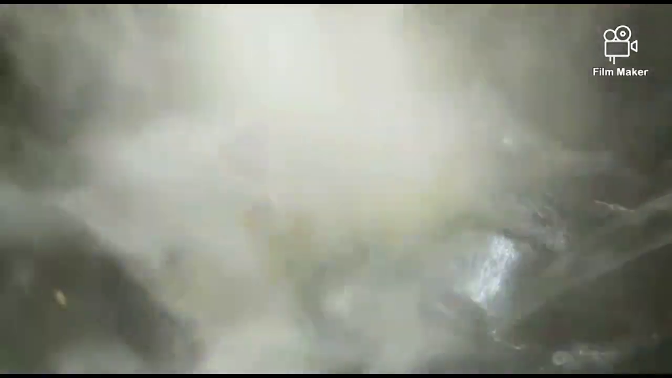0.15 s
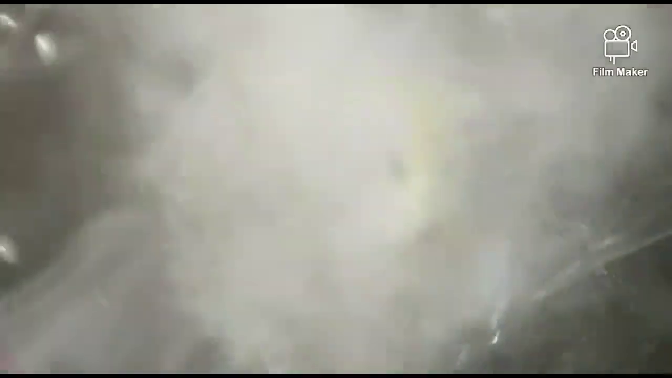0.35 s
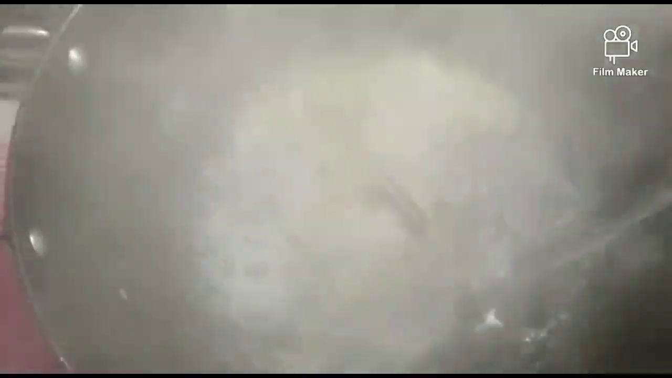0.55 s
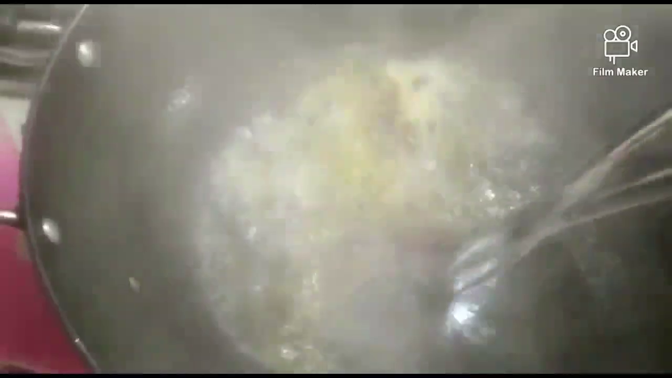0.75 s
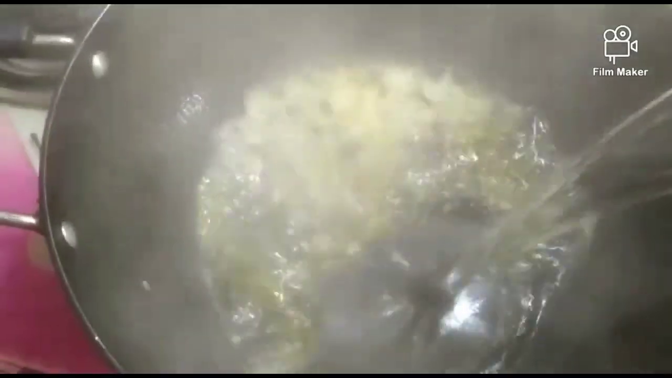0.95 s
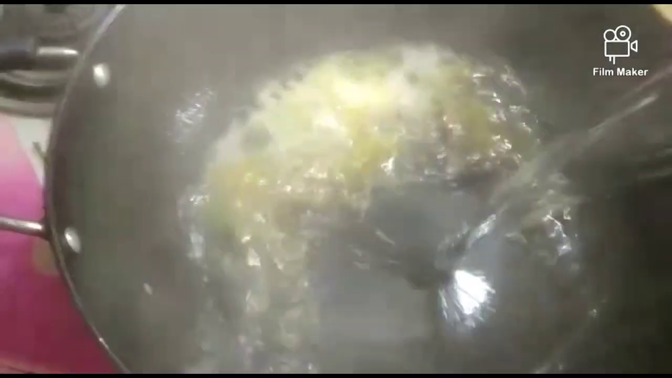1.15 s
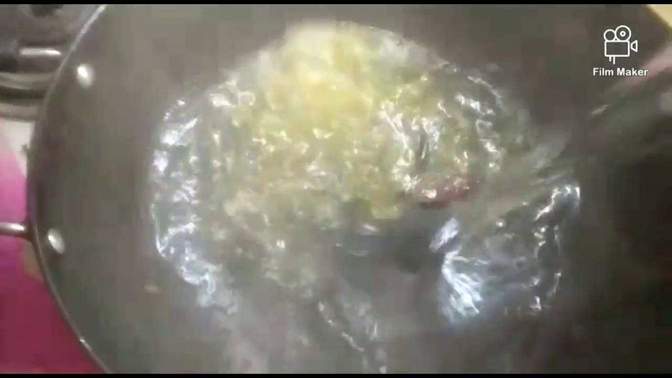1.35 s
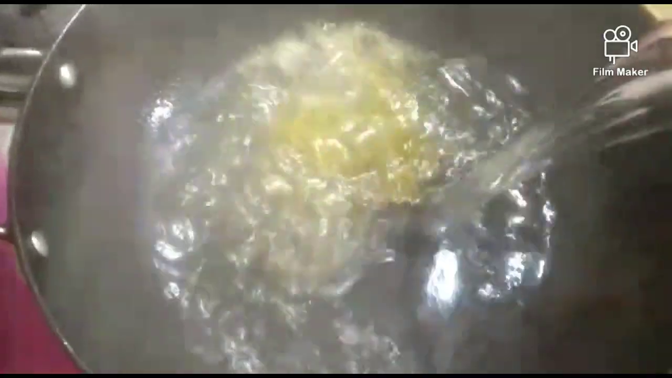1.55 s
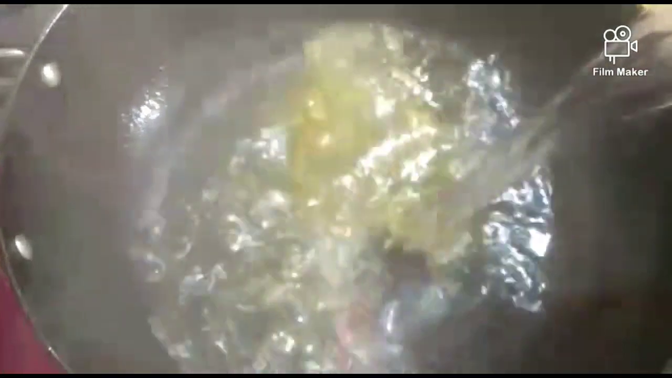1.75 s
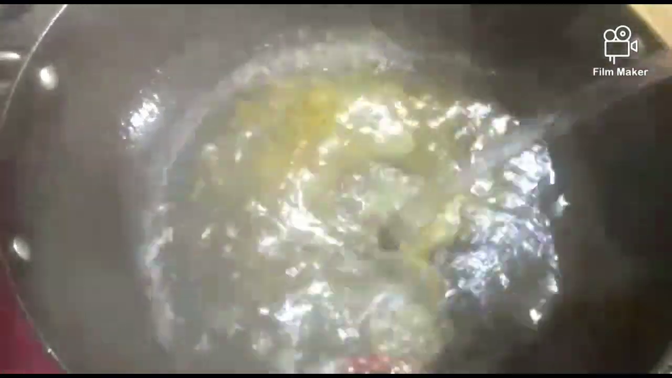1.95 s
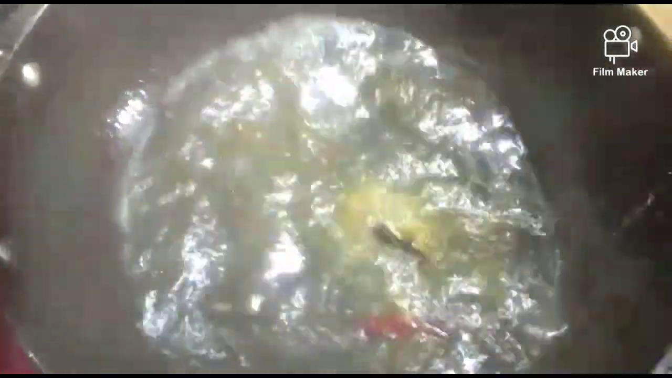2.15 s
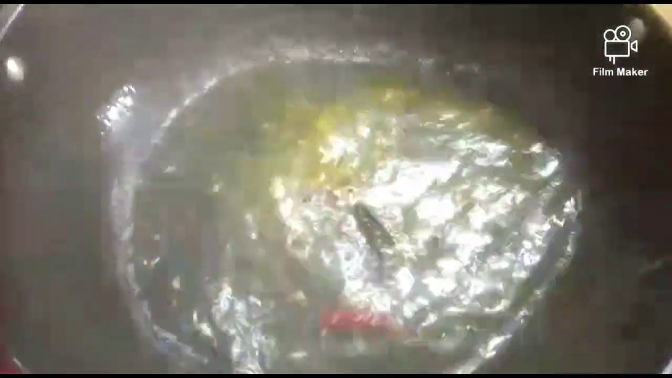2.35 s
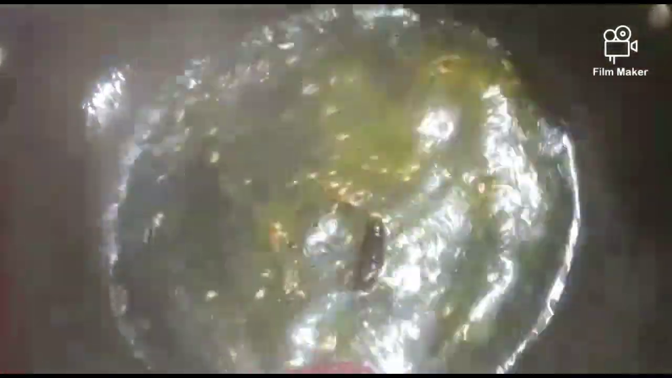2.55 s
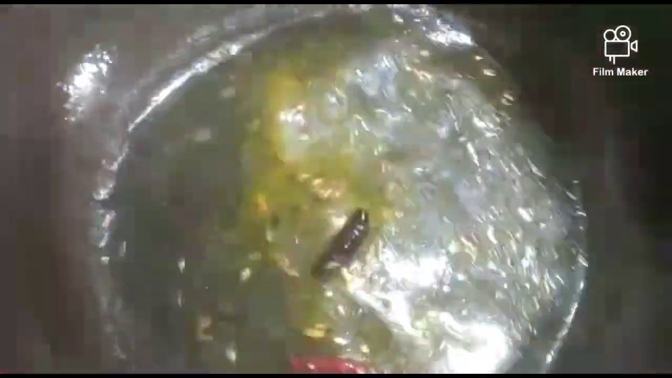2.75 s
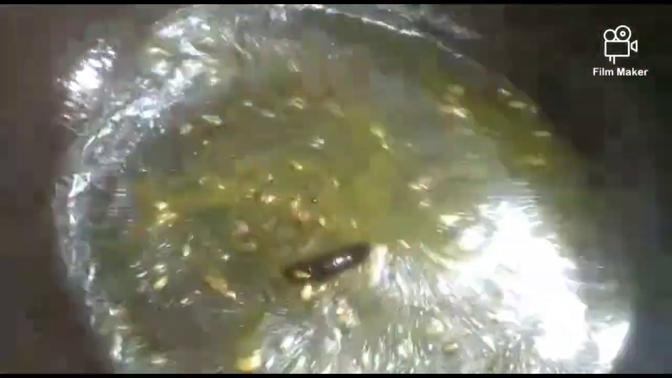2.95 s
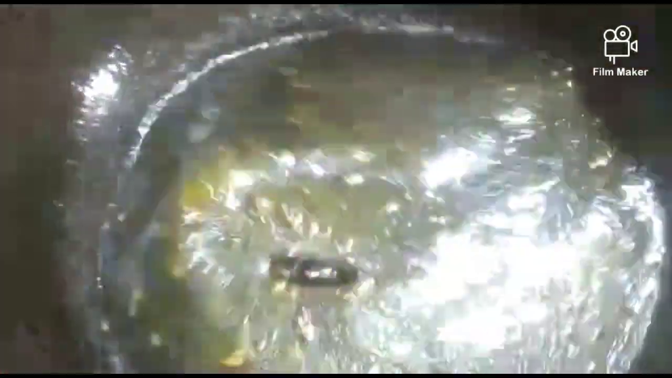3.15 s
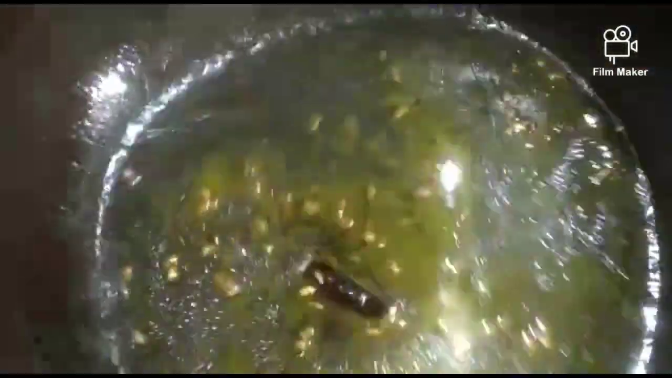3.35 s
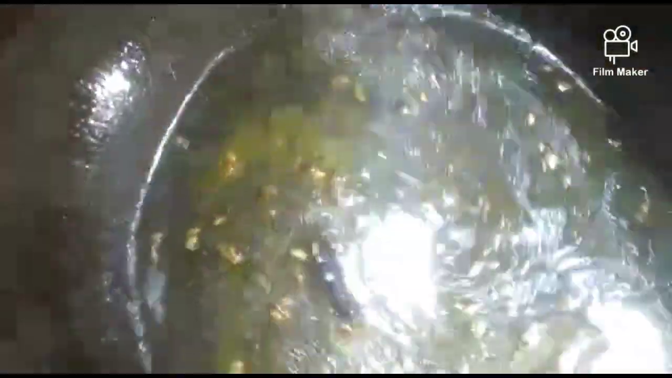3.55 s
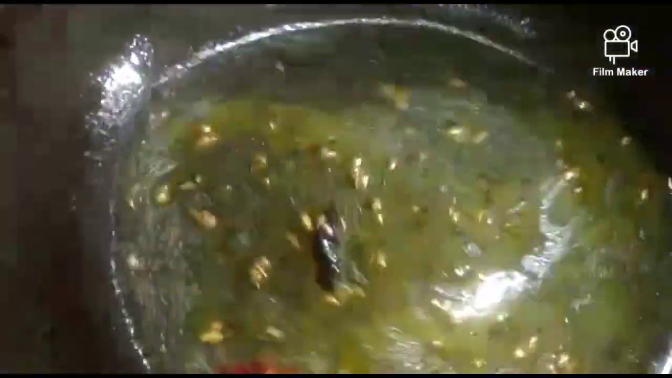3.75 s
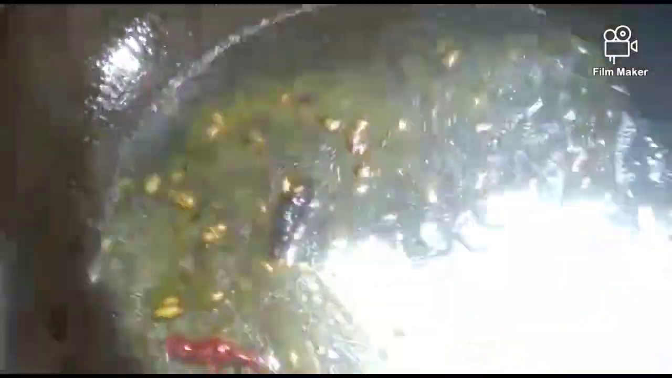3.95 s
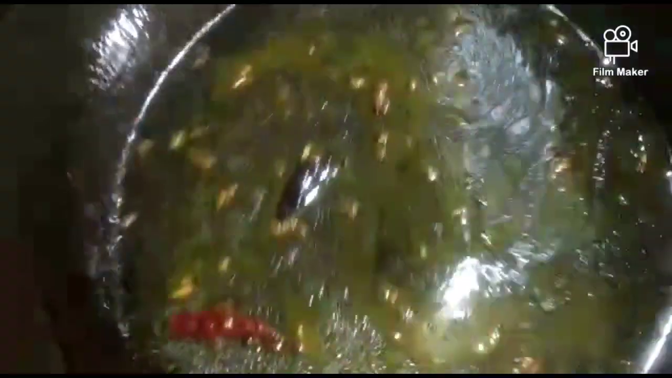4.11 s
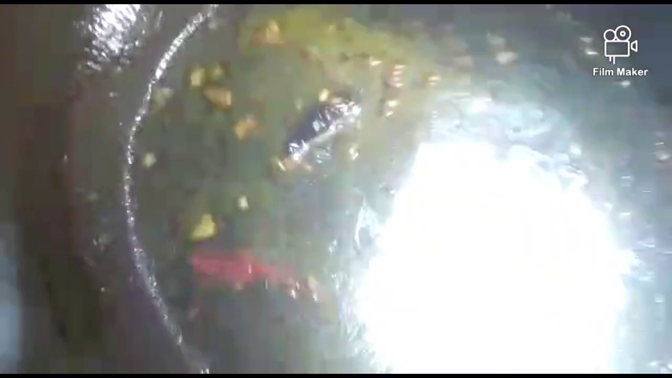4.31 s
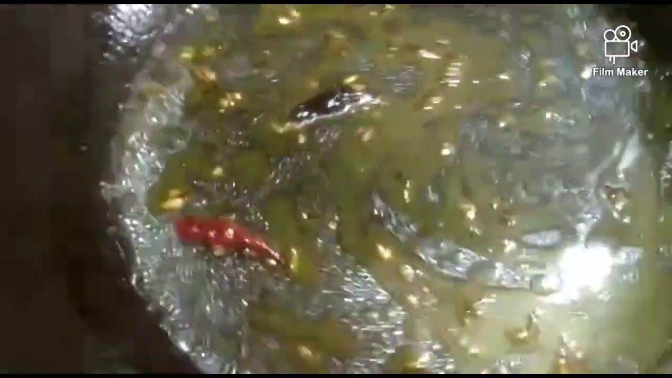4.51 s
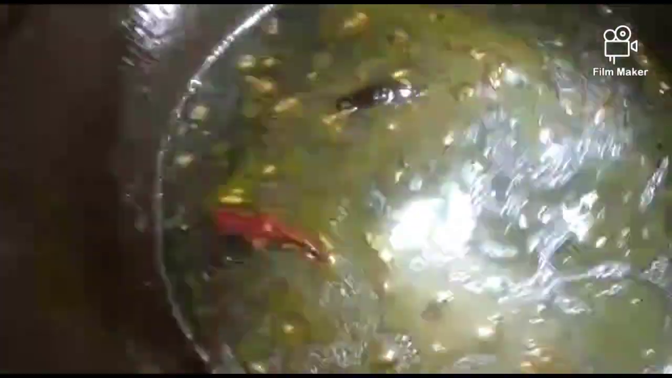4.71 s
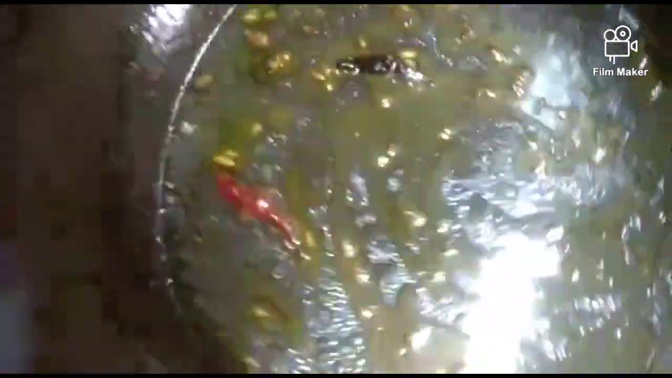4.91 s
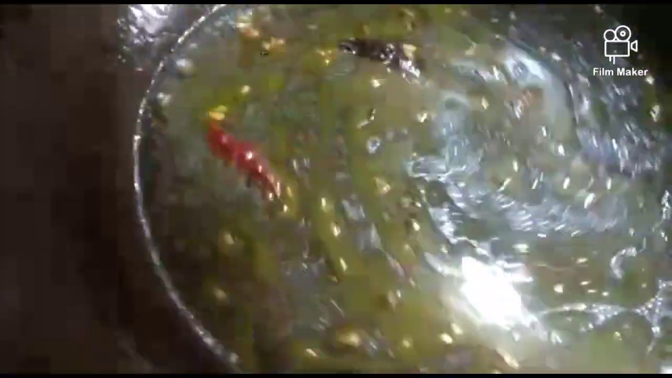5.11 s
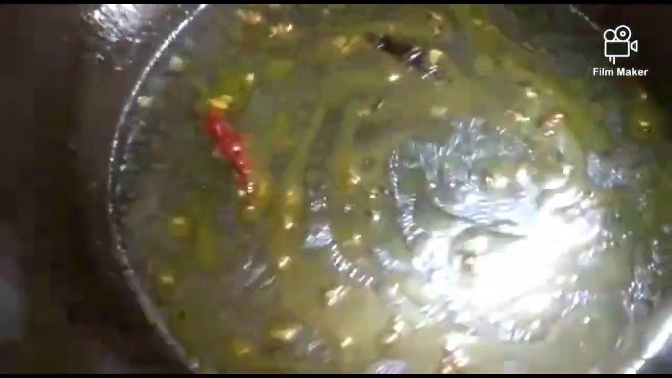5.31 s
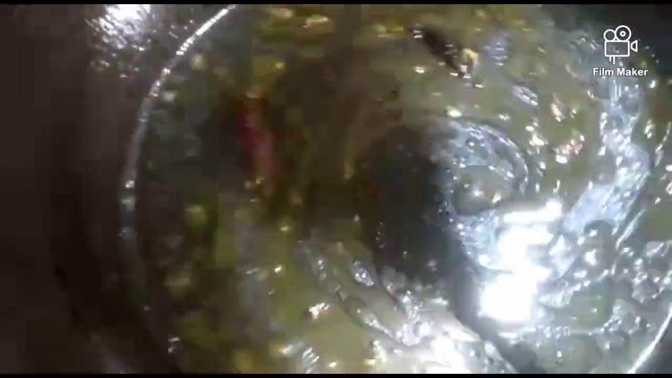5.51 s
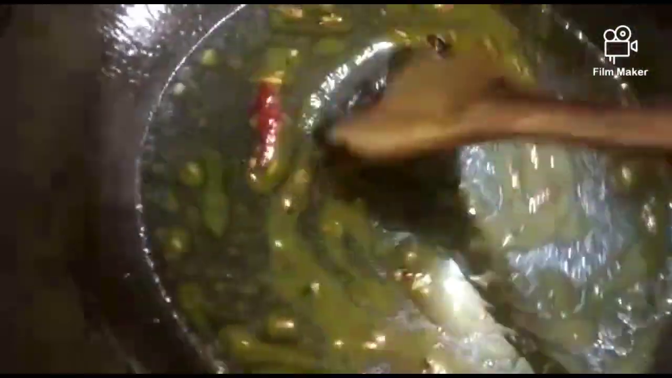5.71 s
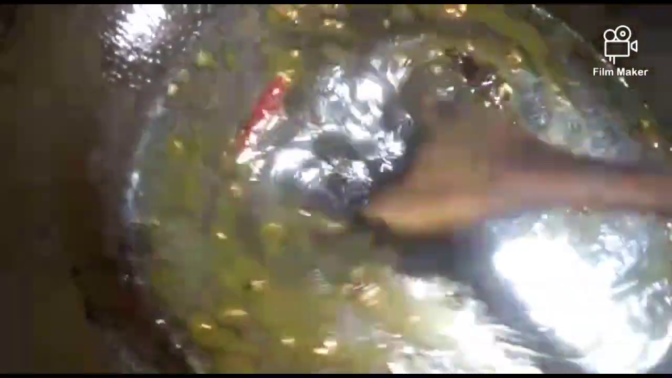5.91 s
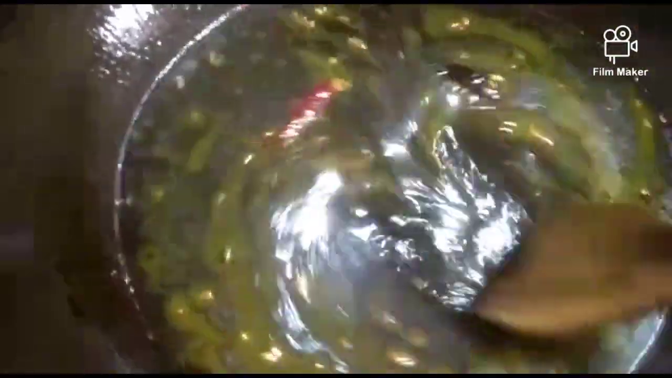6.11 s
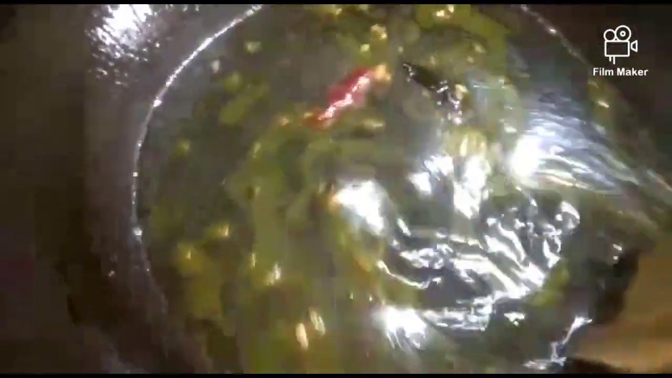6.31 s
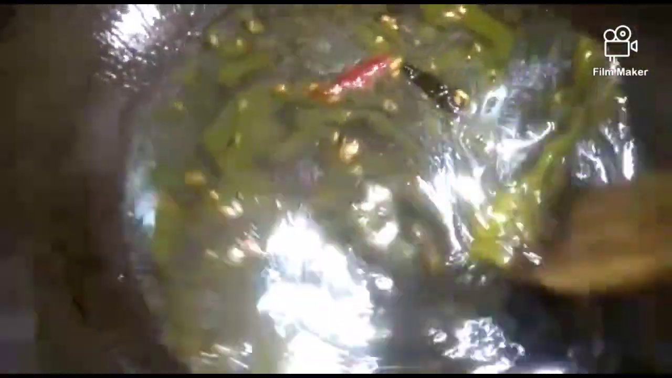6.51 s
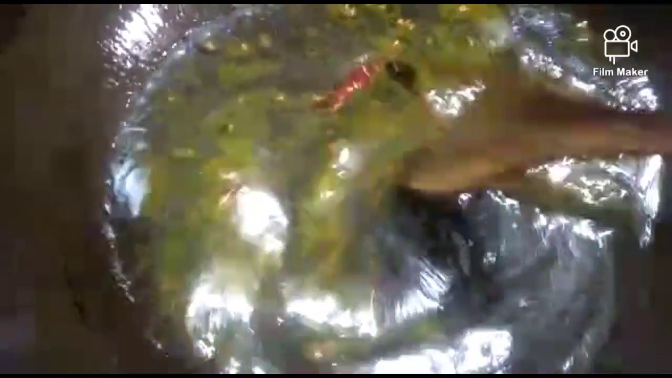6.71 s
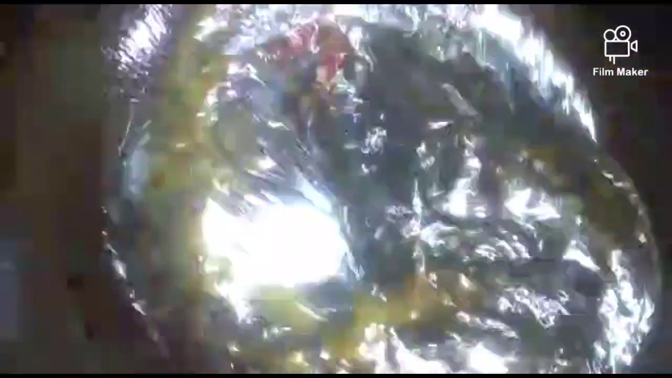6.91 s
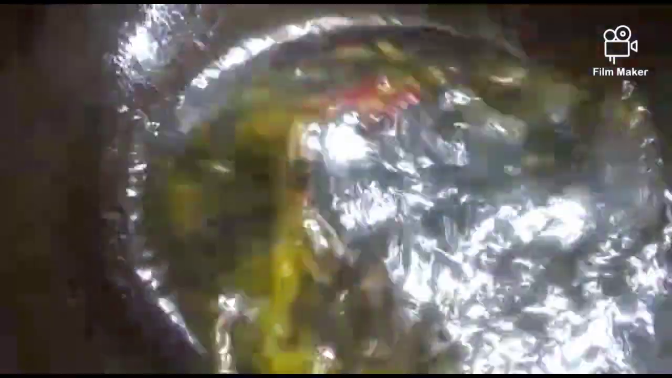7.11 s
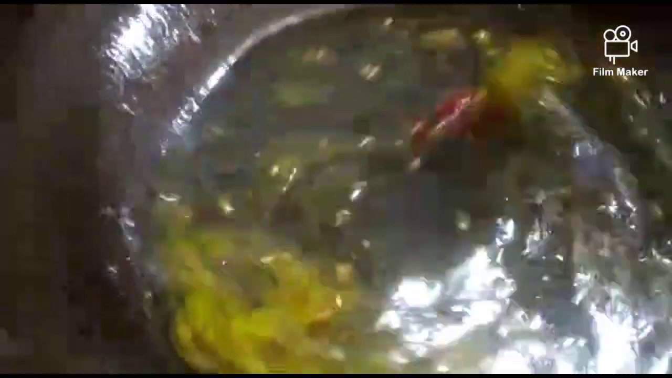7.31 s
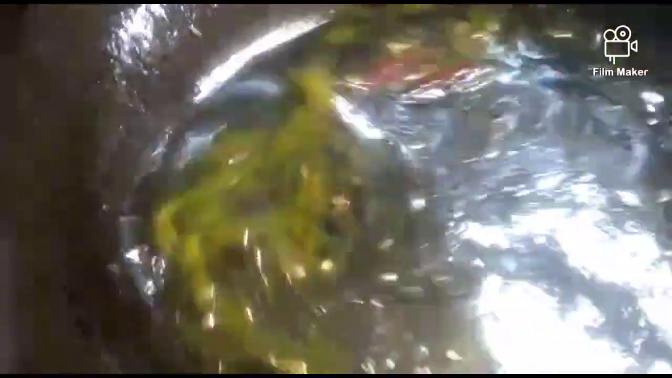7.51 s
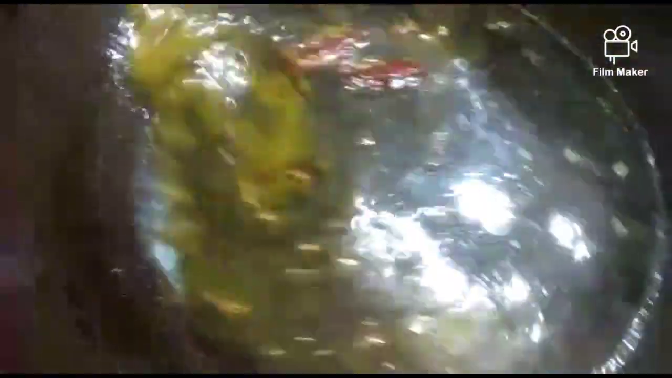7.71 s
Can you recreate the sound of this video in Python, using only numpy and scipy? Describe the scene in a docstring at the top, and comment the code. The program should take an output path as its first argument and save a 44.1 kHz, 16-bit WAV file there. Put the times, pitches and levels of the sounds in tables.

```python
"""Oil and spices sizzle as water is poured into a hot wok: random bubble clicks fizz and spatter, thinning to
a crackle as the pan cools, while larger bubbles boil beneath and lone drops spit.
A steel vessel clangs down as decaying beating modes; a wooden spatula sloshes, rasps and knocks the wok's
modes, and the sizzle wakes again. Filtered noise makes the steam buffeting the microphone ports and the gas
flame's rumble; dense echoes make the small hard kitchen."""
import sys
import numpy as np
from scipy import signal
from scipy.fft import rfft, irfft, next_fast_len
from scipy.io import wavfile

SR = 44100
rng = np.random.default_rng(int(sys.argv[2]) if len(sys.argv) > 2 else 0)


def file_out(sig):
    """Save sig as 16-bit WAV at sys.argv[1]."""
    # one column per channel
    cols = np.atleast_2d(sig).T
    # limit, then scale
    lim = np.clip(cols, -1, 1)
    pcm = np.round(lim * 32767).astype(np.int16)
    wavfile.write(sys.argv[1], SR, pcm)


N = 341951
TIME = np.arange(N) / SR


def undb(db):
    """Decibels to gain."""
    return 10 ** (np.asarray(db) / 20)


def curve(rows):
    """Level against time, joined by straight lines."""
    rows = np.asarray(rows)
    return np.interp(TIME, rows[:, 0], rows[:, 1])


def unit(x):
    """Scale to rms 1."""
    return x / np.sqrt(np.mean(x ** 2) + 1e-18)


def rfft_hz(x):
    """Frequencies of the padded spectrum of x."""
    return np.fft.rfftfreq(2 * next_fast_len(x.shape[-1] // 2 + 2048), 1 / SR)


def weigh(x, gain):
    """Multiply the padded spectrum of x by a gain."""
    size = 2 * (len(gain) - 1)
    return irfft(rfft(x, size) * gain, size)[..., :x.shape[-1]]


def shape(x, points):
    """Filter by (freq_hz, gain_db) points, falling 40 dB per octave beyond both ends."""
    hz, db = np.transpose(points)
    octave, known = np.log2(rfft_hz(x) + 1), np.log2(hz)
    below = np.maximum(known[0] - octave, 0)
    above = np.maximum(octave - known[-1], 0)
    return weigh(x, undb(np.interp(octave, known, db) - 40 * (below + above)))


def resonate(x, hz, q):
    """Two-pole band-pass."""
    hz = min(hz, .4 * SR)
    b, a = signal.iirpeak(hz, max(q, hz / (.4 * SR)), fs=SR)
    return signal.lfilter(b, a, x)


def walk(rate):
    """Random wander of spread about 1, reaching a new value rate times a second."""
    return 1.2 * np.interp(TIME * rate, np.arange(4096), rng.standard_normal(4096))


def add(out, s, sound):
    """Mix a sound in at time s."""
    start = int(s * SR)
    out[:, start:start + sound.shape[-1]] += sound[..., :N - start]


def fade(t, t60):
    """Exponential decay, 60 dB down at t60."""
    return np.exp(-np.log(1000) * t / t60)


def pair(size, alike):
    """Left and right noises with a given likeness (1 is mono)."""
    mid, side = rng.standard_normal((2, size))
    alike = np.clip(alike, 0, 1)
    return np.sqrt((1 + alike) / 2) * mid + np.sqrt((1 - alike) / 2) * np.array([side, -side])


def echoes(x, t60, db, alike):
    """Add dense reflections that die away; the two ports hear nearly the same bass."""
    t = np.arange(SR // 2) / SR
    bass = shape(pair(len(t), .9), [(20, 0), (1000, 0), (1800, -12)])
    treble = shape(pair(len(t), alike), [(900, -12), (1600, 0), (20000, 0)])
    tail = (bass + treble) * fade(t, t60) * (1 - fade(t, t60 / 10))
    tail *= undb(db) / np.sqrt(np.sum(tail ** 2) / 2)
    return x + signal.fftconvolve(x, tail, axes=1)[:, :N]


def bursts(per_s, spread_db, smear_s, smear_db):
    """Random clicks of uneven size, each with its own short rustle of reflections in the bowl."""
    born = rng.random(N) < per_s / SR
    size = undb(spread_db * np.minimum(rng.exponential(size=N), 5.5)) * rng.choice([-1, 1], N)
    clicks = born * size / np.sqrt(per_s)
    # clicks are spread over the pan, so each reaches the left port after its own delay in samples
    lag = np.round(8 + 3.7 * rng.standard_normal(N)).astype(int)
    left = np.bincount(np.clip(np.arange(N) + lag, 0, N - 1), clicks, N)
    # the rustle is noise that follows the smoothed power of the clicks
    keep = np.exp(-1 / (smear_s * SR))
    power = signal.lfilter([1 - keep], [1, -keep], clicks ** 2 + 1e-18)
    rustle = np.sqrt(power) * rng.standard_normal((2, N))
    return unit(np.array([left, clicks]) + undb(smear_db) * rustle)


def ring(modes, t):
    """Decaying modes, each a touch out of tune from blow to blow; the left port hears them late."""
    hz, db, t60 = np.transpose(modes)[:, :, None]
    hz = hz * (1 + .004 * rng.standard_normal((len(modes), 1)))
    size = undb(db) * fade(t, t60)
    lags_s = (4 / SR, 0)
    return np.array([(size * np.sin(2 * np.pi * hz * np.maximum(t - lag, 0))).sum(0) for lag in lags_s])


def flame():
    """The gas flame rumbles under the wok as shaped noise, nearer the left port."""
    # burner rumble over time: start_s [s], level_db [dB]
    flame_level = [(1.4, -61), (2.1, -53), (3.1, -50.5), (4.4, -49), (5.3, -47), (6.9, -43.5), (7.1, -49)]
    # spectrum of the rumble: freq_hz [Hz], gain_db [dB]
    flame_colour = [(15, 4.5), (35, 1), (65, -3), (80, -0.5), (92, 6), (100, 0), (109, 4), (124, -13.5),
                    (145, -9), (175, -6.5), (205, -15.5), (275, -5.5), (330, -12.5), (700, -19.5),
                    (2000, -31)]
    rumble = unit(shape(pair(N, 0.86), flame_colour)) * undb([[1.8], [-1.8]])
    return rumble * undb(curve(flame_level))


def steam():
    """The first cloud of steam buffets the ports as fluttering noise; as it slows a deep rumble is left."""
    # spectrum of the deep rumble: freq_hz [Hz], gain_db [dB]
    rumble_colour = [(2, 26), (5, 17), (18, -11), (45, -7), (90, -24), (200, -40)]
    # spectrum of the first blast: freq_hz [Hz], gain_db [dB]
    buffet_colour = [(35, 6), (70, -5), (120, -3), (200, -8.5), (400, -9.5), (1200, -17)]
    rumble_db, rumble_t60_s = -19.5, 1.9
    buffet_db, buffet_hold_s, buffet_t60_s, flutter_db = -21.5, 0.11, 0.3, 2.3
    rumble = unit(shape(pair(N, 0.37), rumble_colour)) * undb(rumble_db) * fade(TIME, rumble_t60_s)
    blast = fade(np.maximum(TIME - buffet_hold_s, 0), buffet_t60_s)
    flutter = undb(buffet_db + flutter_db * walk(66))
    buffet = unit(shape(pair(N, 0.15), buffet_colour)) * blast * flutter
    return rumble + buffet


def vessel():
    """The vessel thuds on the stove top, shaking it and the wok, and rocks; each contact feeds its ring, which
    the hand damps."""
    # contacts: a light knock before the vessel is set down, then the vessel rocking to rest: start_s [s],
    # thud_db [dB], ring_db [dB]
    contacts = [(3.521, -29.5, -63), (3.674, -11.5, -18.5), (3.697, -25, -28), (3.723, -26, -41),
                (3.84, -32, -55)]
    # modes of the stove top and of the wok the thud shakes: pitch_hz [Hz], level_db [dB], t60_s [s]
    shaken_modes = [(179.2, -13, 0.37), (303, -15, 0.18), (331, -19, 0.3), (500, -13.5, 0.19),
                    (601, -14, 0.53), (679.3, -9, 0.5), (718, -10, 0.24), (794, -6, 0.22), (853, -17, 0.21),
                    (1045, -20, 0.45), (1140, -19, 0.3), (1276, -20, 0.28)]
    # the vessel's bending modes, close pairs that beat: pitch_hz [Hz], level_db [dB], t60_s [s], split_hz [Hz]
    vessel_modes = [(2445, -3, 0.41, 18), (4860, -0.5, 0.27, 10), (8030, 1.5, 0.26, 12),
                    (9200, -19, .12, 27), (11820, -20, 0.14, 30), (12880, -1, 0.089, 17),
                    (13910, -12, 0.15, 35)]
    gripped_s = 3.755  # from here the hand damps the ring
    ring_rise_s = 0.022  # the ring spreads round the rim
    thuds, clangs, t = np.zeros((2, N)), np.zeros((2, N)), np.arange(SR // 2) / SR
    for s, thud_db, _ in contacts:
        crack = shape(pair(len(t), 0.25), [(150, -31), (280, -2), (780, 6.5), (1300, -10.5),
                                           (2300, -2), (3300, -17), (4200, -40), (14000, -32)])
        crack = crack * (fade(t, 0.064) + undb(-15.5) * fade(t, 0.29))
        clunk = np.sin(2 * np.pi * 660 * t) * fade(t, 0.02) * (1 - fade(t, 0.026))
        shaken = ring(shaken_modes, t) * (1 - fade(t, 0.053))
        thud = undb(7.5) * clunk + undb(-6) * shaken + undb(7.0) * crack
        add(thuds, s, undb(thud_db) * thud)
    for hz, db, t60, split_hz in vessel_modes:
        swing = np.zeros((1, N))
        for s, _, ring_db in contacts:
            add(swing, s, undb(db + ring_db) * fade(t, t60) * (1 - fade(t, ring_rise_s)))
        # the rim chatters on the stove, which roughens each tone
        phase = 2 * np.pi * hz * TIME + 2 * rng.random((2, 1)) + 0.41 * walk(200)
        twin = .3 * np.sin(phase + 2 * np.pi * split_hz * (TIME - contacts[1][0]))
        clangs += swing * undb(2.0 * walk(157)) * (np.sin(phase) + twin)
    held = np.interp(TIME - gripped_s, [0, .03, .16], undb([0, -9, -22]))
    return thuds, held * clangs


def knocks():
    """Wood on the wok: a hollow tock, a dull crack, a short ring, and a jolt of the pan on its stand."""
    # spatula blows: start_s [s], level_db [dB], contact pitch_hz [Hz], crack_db, ring_db, jolt_db [dB]
    blows = [(5.275, -39.5, 574, 4, -1.5, -1), (5.307, -39, 560, 4, -1, -7), (5.322, -42, 1100, -1, -6, -9),
             (5.349, -41.5, 940, -3, 3, -12), (5.38, -50, 900, 1, 5, -5), (5.677, -38, 910, -2, -10, -14),
             (5.834, -17, 1170, 8, -9, -10), (5.877, -29, 1970, -5, -19, -14),
             (7.009, -33, 1990, -3, -25, -14), (7.537, -35, 824, 3, -20, -12),
             (7.616, -13, 1060, -4, -7.5, -16), (7.626, -24, 1120, 2, -5, -10),
             (7.703, -12.5, 760, 3, -6, -3), (7.717, -25, 940, -3, -2, 0), (7.728, -21, 970, -3, -1, -3)]
    # modes of the filled wok: pitch_hz [Hz], level_db [dB], t60_s [s]
    wok_modes = [(325, -10, 0.4), (385, -3, 0.16), (497, -12, 0.51), (770, -1, 0.12), (1052, 0, 0.051),
                 (1136, -4, 0.059), (1353, -13, 0.19), (1574, -7, 0.092), (1840, -11, .13),
                 (2020, -13, 0.15), (2420, -1.5, 0.049), (2980, 0, .055)]
    out, t = np.zeros((2, N)), np.arange(SR // 2) / SR
    for s, db, hz, crack_db, ring_db, jolt_db in blows:
        tock = np.sin(2 * np.pi * hz * t) * fade(t, 0.017) * (1 - fade(t, 0.0083))
        crack = shape(pair(len(t), 0.61), [(150, -9), (400, 12), (700, -3.0), (1250, -4.0),
                                           (1700, 1.0), (2600, -2), (3600, -10.0), (10000, -16)])
        crack = crack * fade(t, 0.056)
        body = resonate(undb(ring_db) * ring(wok_modes, t) + undb(crack_db) * crack, hz, q=1.77)
        body = shape(body, [(40, 0), (2.57 * hz, 0)])  # a softer contact leaves the high modes still
        jolt = shape(pair(len(t), 0.87), [(50, -7), (130, 2), (320, -14)]) * fade(t, 0.23)
        add(out, s, undb(db) * (undb(2.0) * tock + body + undb(jolt_db) * jolt))
    return out * undb([[-1.5], [1.5]])  # nearer the right port


def stir():
    """The spatula sloshes the broth and its wooden edge rasps on steel; strokes swell, hold and settle."""
    # strokes: start_s [s], push_s [s], slosh level_db [dB], rasp_db against the slosh [dB]
    strokes = [(5.26, 0.048, -64, 8), (5.87, 0.17, -50.5, 3), (6.24, 0.17, -46.5, 4),
               (6.69, 0.038, -46, -4.5), (7.12, 0.19, -51, -3), (7.52, .2, -51, 0)]
    # spectrum of the sloshing broth: freq_hz [Hz], gain_db [dB]
    slosh_colour = [(130, -22), (180, -7), (220, -6.5), (275, -1), (322, -7), (365, -9), (430, -4),
                    (539, -9), (581, -0.5), (680, -10.5), (1070, -9.5), (1240, -11), (1600, -28),
                    (2080, -40), (3520, -120)]
    # spectrum of the wooden edge on steel: freq_hz [Hz], gain_db [dB]
    rasp_colour = [(1000, -2.5), (1500, -1.5), (2600, -4), (3600, -11), (5000, -20)]
    attack_s, settle_t60_s = 0.031, 2.06
    slosh = unit(shape(bursts(1500, spread_db=2.5, smear_s=.005, smear_db=-12.0), slosh_colour))
    rasp = unit(shape(bursts(2500, spread_db=-4.0, smear_s=.003, smear_db=0.0), rasp_colour))
    sloshing, rasping = np.zeros((2, N))
    for s, push_s, db, rasp_db in strokes:
        t = TIME - s
        swell = np.clip(t / attack_s, 0, 1)
        settle = fade(np.maximum(t - attack_s - push_s, 0), settle_t60_s)
        stroke = undb(db) * swell * settle
        sloshing = np.maximum(sloshing, stroke)
        rasping = np.maximum(rasping, stroke * undb(rasp_db))
    return sloshing * slosh + rasping * rasp


def spits():
    """Lone drops snap open as noise cracks, each with a short spray."""
    # loudest drops: start_s [s], level_db [dB, 12.5 above the rms of the first 2 ms], pitch_hz [Hz]
    drops = [(3.976, -15, 9000), (4.028, -20, 9150), (4.435, -22, 9000), (4.485, -21, 9000),
             (4.533, -16, 9460), (4.5958, -16.5, 8500), (4.646, -20, 7970), (4.7585, -23, 8070),
             (4.834, -24, 8860), (5.1552, -26, 5940), (5.18, -22, 8280), (5.25, -24, 6000),
             (5.678, -21, 7300), (5.7172, -20, 5420), (6.6797, -21.5, 9700), (6.878, -25, 11800),
             (6.9224, -21, 7700), (7.017, -29, 8000), (7.578, -27, 8000), (7.731, -20, 9500),
             (7.735, -18, 9500)]
    out, t = np.zeros((2, N)), np.arange(SR // 20) / SR
    for s, db, hz in drops:
        crack = pair(len(t), .4) * (fade(t, .006) + undb(-20) * fade(t, .03))
        crack = shape(crack, [(500, -8), (hz / 3, -4), (hz, 0), (18000, -4)])
        add(out, s, crack / crack[:, :SR // 500].std() * undb(db - 12.5))
    return out


def heat():
    """How hard the oil works, in dB above a steady pour, with small random surges."""
    # sizzle under the pour: start_s [s], level_db [dB]
    poured = [(0.0, -9.5), (0.2, -13), (0.45, -15.5), (1.03, -19), (1.3, -18.5), (1.39, -20), (1.47, -17.5),
              (2.1, -19.5), (2.22, -20), (2.36, -18.8), (2.53, -18), (2.72, -23), (3.02, -24),
              (3.08, -28.5), (3.2, -21.5), (3.45, -26), (3.64, -26.5)]
    # sizzle as the pan cools: start_s [s], level_db [dB]
    cooling = [(3.8, -29), (4.0, -32.5), (4.11, -35), (4.22, -32.5), (4.38, -34), (4.46, -37.5),
               (4.56, -39), (4.62, -44.5), (4.7, -39.5), (4.99, -42), (5.12, -43), (5.36, -45), (5.41, -43),
               (5.5, -45.5)]
    # sizzle as stirring wakes it again: start_s [s], level_db [dB]
    stirred = [(5.8, -43.5), (5.88, -44.5), (6.24, -44.5), (6.3, -40), (6.45, -46.5), (6.55, -44),
               (6.68, -44), (6.75, -50.5), (6.9, -43.5), (6.99, -52), (7.08, -41), (7.22, -34.5),
               (7.5, -36), (7.75, -36.5)]
    steady_pour_db, surge_db, surges_per_s = -20, 0.8, 20
    return curve(np.vstack([poured, cooling, stirred])) - steady_pour_db + surge_db * walk(surges_per_s)


def gushes():
    """Extra dB while a gush of water boils off, rising to a peak and dying away."""
    # water reaching fresh hot steel: start_s [s], swell_db [dB]
    swells = np.array([(0.93, 0), (1.16, 2), (1.43, 0.5), (1.75, 2), (2.01, 3.5), (2.33, 3.5), (3.28, 2)])
    peak_s = 0.031  # from the start of a gush to its peak
    age = np.maximum(TIME - swells[:, :1], 0) / peak_s
    return swells[:, 1] @ (age * np.exp(1 - age))


def boil(heat_db, gush_db):
    """Larger bubbles churn under the oil; they build as water gathers and die out as it cools the steel."""
    # spectrum of the churning: freq_hz [Hz], gain_db [dB]
    boil_colour = [(110, -44), (180, -19.5), (285, -3.5), (327, -15.5), (383, -6.5), (457, -13), (502, 6),
                   (564, -8), (639, 0), (822, -3.5), (992, -3.5), (1080, 2), (1160, -3), (1235, 5),
                   (1340, -9.5), (1450, -9), (1640, -0.5), (1950, -7), (2200, -3), (2860, -8.5),
                   (4840, -120)]
    level_db, follows_heat = -36, 0.42  # level under a steady pour, dB per dB of heat
    full_s, rise_db_per_s = 1.1, 2  # enough water has gathered
    ends_s, fall_db_per_s = 3.18, 5  # the steel is now too cool to keep it boiling
    churn = unit(shape(bursts(2500, spread_db=1.5, smear_s=0.0089, smear_db=-16), boil_colour))
    shallow_db = rise_db_per_s * np.maximum(full_s - TIME, 0)
    cooled_db = fall_db_per_s * np.maximum(TIME - ends_s, 0)
    driven_db = level_db + follows_heat * heat_db + gush_db
    return churn * undb(driven_db - shallow_db - cooled_db + 0.81 * walk(25.0))


def pops(count):
    """Single bubbles burst, each ringing for a few cycles at a pitch set by its size."""
    typical_hz, scatter_octaves = 8980, 0.304  # median pitch, scale of its logistic scatter
    decay_cycles, spread_db = 20, 3.8  # cycles to fall 60 dB, scale of the exponential spread in level
    when, pitch, strength, place = rng.random((count, 4)).T[:, :, None]
    hz = np.minimum(typical_hz * 2 ** (scatter_octaves * np.log(pitch / (1 - pitch))), .4 * SR)
    size = undb(spread_db * np.minimum(-np.log(1 - strength), 4.5))
    step = np.arange(160)  # samples in one pop
    cycles = hz * step / SR
    grains = size * np.sin(2 * np.pi * cycles) * fade(cycles, decay_cycles)
    # each pop reaches the left port late, by its place in the pan
    start, lag = (when * N).astype(int), (2 + 13 * place).astype(int)
    ports = [np.bincount((start + late + step).ravel(), grains.ravel(), N)[:N] for late in (lag, 0)]
    return unit(np.array(ports))


def sizzle(heat_db, gush_db):
    """The hotter the pan, the more bubbles burst: a fine fizz, pops over it, and a coarser spatter."""
    # spectrum of the fine fizz and pops: freq_hz [Hz], gain_db [dB]
    fizz_colour = [(4500, -9.5), (6400, -13), (7400, -3.5), (8500, -1), (9600, -1), (11000, -3),
                   (12500, -5), (14200, -7), (16000, -10)]
    # spectrum of the coarser spatter: freq_hz [Hz], gain_db [dB]
    spatter_colour = [(1120, -4.5), (1900, -5.5), (2610, -0.5), (3700, -1), (4700, 0), (6240, -2),
                      (7000, -1), (9100, -52), (15400, -120)]
    fizz_db, fizz_follows_gush = -20.5, 0.12  # level before pops under a steady pour, dB per dB of gush
    pop_db = -5  # against the fizz
    spatter_db, spatter_follows_heat, spatter_follows_gush = -26, 0.9, 0.99
    # the fizz moves towards the right port: left minus right in dB
    pan_db = np.interp(TIME, (2.1, 3.1), [0, -3])
    per_s = 10500 * undb(.45 * heat_db)
    fine = unit(shape(bursts(per_s, spread_db=3.4, smear_s=0.005, smear_db=-0.5), fizz_colour))
    fine = fine + undb(pop_db) * unit(shape(pops(count=14000), fizz_colour))
    fine_db = fizz_db + heat_db + fizz_follows_gush * gush_db
    fine = fine * undb(fine_db + np.array([pan_db, -pan_db]) / 2)
    coarse = unit(shape(bursts(.7 * per_s, spread_db=4.0, smear_s=0.008, smear_db=1.0), spatter_colour))
    coarse_db = spatter_db + spatter_follows_heat * heat_db + spatter_follows_gush * gush_db
    return fine + coarse * undb(coarse_db + 0.5 * walk(30))


def scene():
    """Pan and blows in a small hard kitchen; knocks come back quickly from the bowl and the wall behind."""
    heat_db, gush_db = heat(), gushes()
    pan = sizzle(heat_db, gush_db) + boil(heat_db, gush_db) + spits() + stir()
    pan = echoes(pan, t60=.25, db=-12, alike=.05)
    in_bowl = echoes(knocks(), t60=0.11, db=-8.0, alike=.2)
    wood = echoes(in_bowl, t60=0.31, db=-9.5, alike=.1)
    thuds, clangs = vessel()
    steel = echoes(thuds, t60=0.92, db=-8.5, alike=0.085) + echoes(clangs, t60=0.39, db=-14, alike=0.085)
    return pan + wood + steel + steam() + flame()


def record(dry):
    """The two ports differ in colour; the loudest peaks clip and the top is cut."""
    # how much more the left port hears than the right: freq_hz [Hz], difference_db [dB]
    port_colour = [(60, -9.5), (125, -4.5), (300, -2), (900, -0.5), (1600, -4), (2700, -6), (4200, -2.5),
                   (6300, -0.5), (16000, 1)]
    top_hz = 15800
    hz, db = np.transpose(port_colour)
    tilt_db = np.interp(np.log(rfft_hz(dry) + 1), np.log(hz), db) / 2
    heard = np.array([weigh(dry[0], undb(tilt_db)), weigh(dry[1], undb(-tilt_db))])
    low_pass = signal.ellip(10, .2, 70, top_hz, fs=SR, output="sos")
    return signal.sosfilt(low_pass, np.clip(heard, -1, 1))


dry = scene()
out = record(dry)
file_out(out)
```